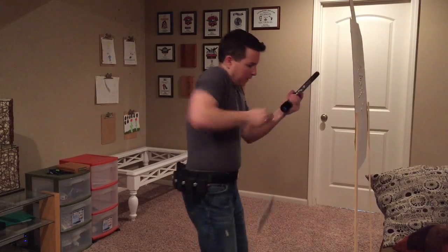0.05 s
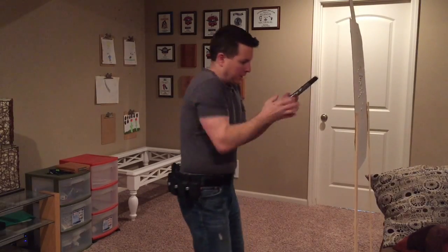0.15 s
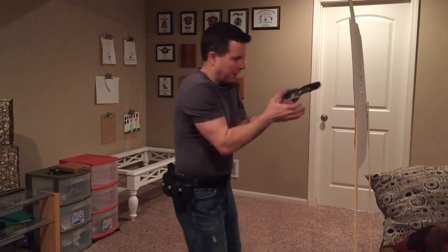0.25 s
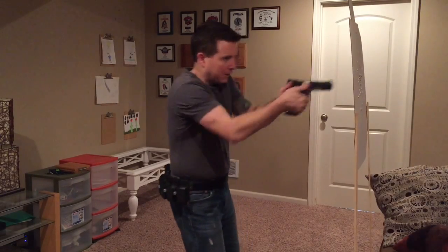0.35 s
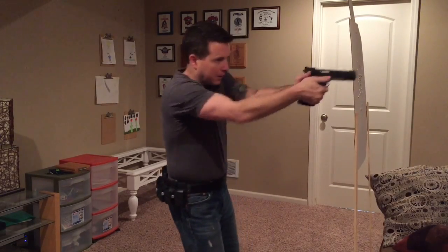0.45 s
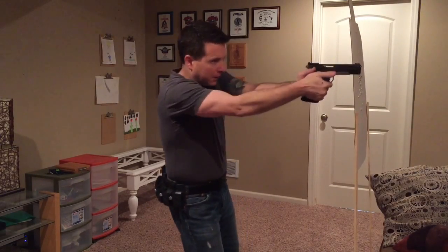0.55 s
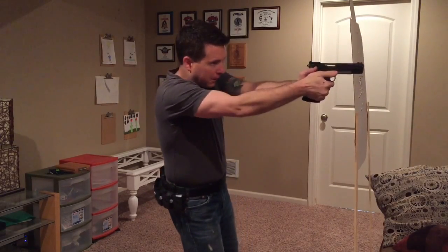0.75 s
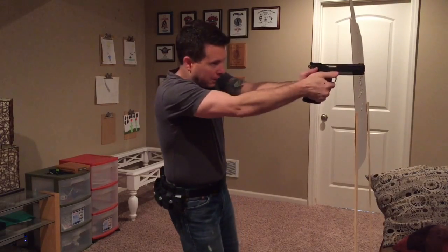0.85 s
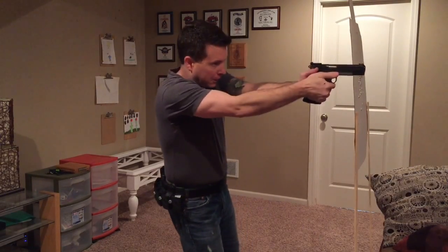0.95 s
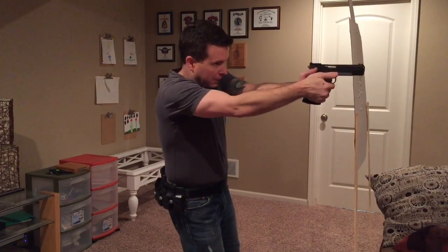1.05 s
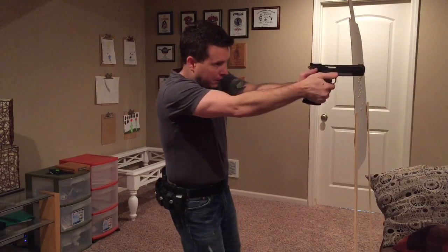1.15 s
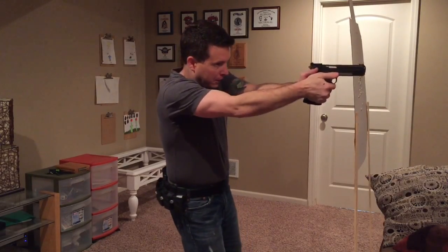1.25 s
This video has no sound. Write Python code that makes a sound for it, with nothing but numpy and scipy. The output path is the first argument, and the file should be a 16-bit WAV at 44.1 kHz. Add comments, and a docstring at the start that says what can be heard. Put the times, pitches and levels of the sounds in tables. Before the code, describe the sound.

A magazine is slapped into a pistol with hard clacks while the empty one bounces on carpet

```python
"""Reloading a pistol

Small catches click, a fresh magazine is slapped home in a double clack, and the dropped steel magazine
bounces and rattles on the carpet. Hard parts give a crack of noise and a ring; soft blows give low thuds
that sag in pitch, and scuffs are short rustles. The quiet room answers with a short tail of reflections,
over a low rumble and a faint hush of steady noise."""
import sys
import numpy as np
from scipy import signal
from scipy.fft import rfft, irfft
from scipy.io import wavfile

SR = 44100
rng = np.random.default_rng(int(sys.argv[2]) if len(sys.argv) > 2 else 0)


def wrap_up_sound(samples):
    """Save the sound to the file named by the first command line argument, as 16-bit audio."""
    columns = np.atleast_2d(samples).T
    # keep every value between -1 and 1, then stretch to whole-number steps
    tamed = np.clip(columns, -1, 1)
    steps = np.round(tamed * 32767).astype(np.int16)
    wavfile.write(sys.argv[1], SR, steps)


def magnitude_from_level(level_db):
    """Linear magnitude for a level in decibels (20 dB per decade)."""
    exponent = np.asarray(level_db, float) / 20
    return 10 ** exponent


N = 57330  # length of the scene in samples


def curve(points, hz):
    """Reads (Hz, value) points on a log-frequency axis."""
    p = np.array(points, float)
    return np.interp(np.log(hz + 0.00087), np.log(p[:, 0]), p[:, 1])


def unit(x):
    """Scales to rms 1."""
    return x / np.sqrt(np.mean(x ** 2))


def highpass(x, order, hz):
    """Takes away the sound below hz."""
    return signal.sosfilt(signal.butter(order, hz, "high", fs=SR, output="sos"), x)


def colour(x, points, tilt_db=0., tilt_from_hz=200):
    """Gives a sound a spectrum, with mean power gain 1; the tilt (dB per octave) is flat below tilt_from_hz."""
    hz = np.linspace(0, SR / 2, 1025)
    tilt = tilt_db * np.log2(np.maximum(hz, tilt_from_hz) / 3000)
    gain = unit(magnitude_from_level(curve(points, hz) + tilt))
    # fold the cepstrum (spectrum of the log gain) so that the filter never sounds before its input
    cepstrum = irfft(np.log(gain))
    cepstrum[1:1024] *= 2
    cepstrum[1025:] = 0
    response = irfft(np.exp(rfft(cepstrum)))
    return signal.fftconvolve(x, response)[:len(x)]


def fade(t, t60):
    """Falls 60 dB in t60 s."""
    return np.exp(-np.log(1000) * t / max(t60, 1e-3))


def burst(rise, t60):
    """Chattering contact: grainy noise that rises in rise s and fades."""
    t = np.arange(SR // 2) / SR
    grain_samples, rattle_db = 20, 2.2
    strengths = np.minimum(rng.exponential(size=len(t) // grain_samples + 1), 3.5)
    grain = np.repeat(strengths, grain_samples)[:len(t)]
    chatter = rng.standard_normal(len(t)) * unit(magnitude_from_level(rattle_db * grain))
    return chatter * np.minimum(t / max(rise, 1e-4), 1) * fade(t, t60)


def ring(x, modes, tilt_db=0., low_hz=1400, depth=1.6):
    """Each blow finds the modes with other strengths; hands, carpet and loose parts make them waver."""
    t, bell = np.arange(len(x)) / SR, 0
    waver_share, scatter_db = .07, 1.0  # waver rate as a share of the mode's pitch; spread of strengths
    for hz, db, t60 in modes:
        strength_db = db + scatter_db * rng.standard_normal() + tilt_db * np.log2(hz / 3000)
        luck = rng.standard_normal((2, 600))
        knots = np.arange(luck.shape[1]) / (waver_share * hz)
        # the complex waver moves both the strength and the phase of the mode
        waver = 1 + depth * (np.interp(t, knots, luck[0]) + 1j * np.interp(t, knots, luck[1]))
        tone = (waver * np.exp(2j * np.pi * hz * t)).real
        bell = bell + magnitude_from_level(strength_db) * fade(t, t60) * tone
    return highpass(signal.fftconvolve(x, bell)[:len(x)], 3, low_hz)


def steady(points):
    """Endless noise of a given colour, rms 1."""
    settle = 2048  # samples dropped while the filter starts up
    return unit(colour(rng.standard_normal(N + settle), points)[settle:])


def add(out, s, x):
    """Mixes x in at time s."""
    i = max(int(s * SR), 0)
    out[i:i + len(x)] += x[:N - i]


def strike(blows, crack, modes, low_hz, depth):
    """Hard parts hit: a crack of broad noise, which also sets the struck parts ringing."""
    out = np.zeros(N)
    for s, db, t60, tilt_db, ring_db in blows:
        contact = burst(.0009, t60)
        noise = colour(contact, crack, tilt_db)
        bell = ring(contact, modes, low_hz=low_hz, depth=depth)
        add(out, s, magnitude_from_level(db) * (noise + magnitude_from_level(ring_db - 30) * bell))
    return out


# The fresh magazine slapped home. Each row: start in seconds, level in dB, time to fall 60 dB in seconds,
# tilt of the crack in dB per octave, ring in dB (strike takes a further 30 dB off the ring).
MAGAZINE_CLACKS = [(0.201, -4.5, 0.044, 5, -9.5), (.205, -12.5, 0.072, 2.5, -4),
                   (0.2151, -16.5, 0.085, 2.5, -9.5), (.2212, -3.5, 0.049, 6, -1.5),
                   (.227, -7, 0.047, 3, -3.5), (.237, -11.5, 0.024, -2, 2.5), (.272, -15.5, .05, 2.5, -1),
                   (0.2937, -21.5, 0.078, 0.5, 3)]
# Colour of the crack. Each row: frequency in Hz, relative strength in dB per Hz.
GUN_CRACK_COLOUR = [(180, -65.5), (300, -28.5), (1480, -5), (2280, 1), (3460, -7.5), (4300, -5),
                    (7440, -14.5), (13300, -15.5), (15200, -24), (16000, -50)]
# Ringing tones of the gun. Each row: frequency in Hz, strength in dB, time to fall 60 dB in seconds.
GUN_TONES = [(1652, -0.5, 0.034), (1900, -7, 0.033), (2130, -1, 0.1), (2170, -6.5, .12), (2292, -7.5, 0.18),
             (2311, -8, 0.15), (2934, -4.5, .03), (3280, -12.5, 0.026), (3907, -6, 0.066),
             (4378, -7.5, 0.014), (5750, -6.5, 0.081), (7770, -9.5, 0.021)]


def magazine_clack():
    """The fresh magazine hits the gun: noisy cracks, with the gun's parts ringing behind them."""
    return strike(MAGAZINE_CLACKS, GUN_CRACK_COLOUR, GUN_TONES, low_hz=1400, depth=.7)


# The magazine catch and small shifts of the grip. Each row: start in seconds, level in dB, time to fall
# 60 dB in seconds, tilt of the crack in dB per octave, ring in dB (strike takes a further 30 dB off the ring).
CATCH_CLICKS = [(0., -46.5, 0.45, 0, 4), (.0268, -31.5, 0.037, -5, 1.5), (.0448, -14, 0.031, 0.5, -13.5),
                (.056, -25.5, 0.045, 1, -2.5), (.997, -68, 0.015, 11, -14), (1.11, -63.5, .03, -4.5, -5),
                (1.28, -57.5, .02, -3, -11), (1.29, -61, 0.024, 1, -2.5)]
# Colour of the click. Each row: frequency in Hz, relative strength in dB per Hz.
CATCH_CRACK_COLOUR = [(120, -48.5), (200, -21), (500, -28.5), (1040, -8.5), (1980, -14.5), (2800, -3),
                      (7140, -13.5), (13300, -17.5), (15100, -19), (16000, -37.5)]
# Ringing tones of the catch. Each row: frequency in Hz, strength in dB, time to fall 60 dB in seconds.
CATCH_TONES = [(1123, -9.5, .04), (1740, -1, .05), (2010, -3.5, 0.15), (2150, 1.5, .04), (2720, -5, .04),
               (3200, -5, 0.067), (6600, -3.5, .03)]


def catch_clicks():
    """Small parts snap or shift: short cracks, with strongly wavering tones behind them."""
    return strike(CATCH_CLICKS, CATCH_CRACK_COLOUR, CATCH_TONES, low_hz=800, depth=1.6)


# The dropped magazine rattling on the carpet. Each row: start in seconds, level in dB, rise in seconds,
# time to fall 60 dB in seconds, tilt in dB per octave, ring in dB.
MAGAZINE_BOUNCES = [(.3456, -15.5, 0.00068, 0.038, 1, -40.5), (.354, -19.5, 0.0036, 0.13, 1, -35),
                    (.374, -29.5, 0.0031, 0.26, 4, -29.5), (.551, -35.5, 0.0039, 0.059, 3, -26),
                    (.5615, -27.5, 0.0053, 0.057, 5, -35.5), (.575, -33, 0.012, 0.11, 0.5, -36),
                    (.72, -48, 0.0044, 0.15, -1, -26.5), (0.7384, -39.5, .003, 0.13, 0, -27),
                    (.752, -42, 0.0012, 0.13, 13, -33), (.8305, -29, 0.00083, 0.022, 4.5, -27),
                    (.838, -36, 0.0065, 0.084, -2, -30), (.849, -41, 0.0033, .08, 0, -29.5),
                    (.864, -34.5, 0.0032, 0.032, 4, -31), (.915, -68.5, 0.018, 0.12, -16, -20)]
# Colour of the rattle. Each row: frequency in Hz, relative strength in dB per Hz.
MAGAZINE_CRACK_COLOUR = [(100, -24), (500, -7.5), (1100, -47), (1500, -13), (2000, 5.5), (4000, -1.5),
                         (5100, -4), (7000, -2.5), (11000, -4.5), (16000, -11.5)]
# Ringing tones of the steel tube. Each row: frequency in Hz, strength in dB, time to fall 60 dB in seconds.
MAGAZINE_TONES = [(1870, -2, .12), (1960, -2, .15), (2010, 0, .15), (2250, -3, .12), (2870, -9, .04),
                  (3450, -11, .035), (4010, -11, .03), (5900, -8, .05), (6250, -11, .03), (6560, -10, .035),
                  (7500, -14, .025), (8600, -11, .025)]


def dropped_magazine():
    """The loose spring and follower chatter and ring the thin steel tube."""
    out = np.zeros(N)
    for s, db, rise, t60, tilt_db, ring_db in MAGAZINE_BOUNCES:
        chatter = burst(rise, t60)
        rattle = colour(chatter, MAGAZINE_CRACK_COLOUR, tilt_db, 1900)
        tube = ring(chatter, MAGAZINE_TONES, tilt_db, 1800)
        add(out, s, magnitude_from_level(db) * (rattle + magnitude_from_level(ring_db) * tube))
    return out


# Soft blows on floor and palm. Each row: start in seconds, level in dB, pitch settled on in Hz,
# time to fall 60 dB in seconds, knock in dB.
SOFT_BLOWS = [(0.046, -50.5, 226, 0.013, -32), (0.203, -50, 60, .08, -35), (0.223, -31, 74, 0.11, -31),
              (0.2232, -21, 515, 0.011, -31), (.2925, -21.5, 405, 0.015, -23.5),
              (0.3471, -17.5, 191, 0.055, -11), (0.376, -23.5, 161.4, 0.067, -20),
              (0.5489, -31.5, 257, 0.031, -11.5), (0.699, -46, 81, 0.16, -12),
              (.736, -32, 323, 0.068, -17.5), (0.742, -32.5, 158.8, 0.47, -38),
              (0.769, -35, 166, 0.051, -31), (0.779, -38, 280, 0.13, -25), (0.83, -22.5, 186, 0.05, -23),
              (0.862, -36.5, 179.5, 0.054, -19)]
# Colour of the dull knock inside each thud. Each row: frequency in Hz, relative strength in dB per Hz.
KNOCK_COLOUR = [(100, -15), (250, 3), (700, -8.5), (1100, -17.5), (3000, -38.5)]


def thuds():
    """A padded blow: a few damped cycles that sag in pitch, with a dull knock."""
    out, t = np.zeros(N), np.arange(SR // 2) / SR
    for s, db, hz, t60, knock_db in SOFT_BLOWS:
        # the pitch starts 45 % high and sags to hz
        cycles = hz * (t + .15 / hz * (1 - np.exp(-t * hz * 3)))
        onset = np.minimum(t * hz * 3, 1)
        boom = -np.sin(2 * np.pi * cycles) * fade(t, t60) * onset
        knock = colour(burst(0.00033, t60), KNOCK_COLOUR)
        knock = knock / np.sqrt(np.mean(knock[:400] ** 2))  # rms 1 over its first 400 samples
        add(out, s, magnitude_from_level(db) * (boom + magnitude_from_level(knock_db) * knock))
    return highpass(out, 2, 50)


# Dull scuffs of cloth or carpet. Each row: start in seconds, level in dB, length in seconds
# (a scuff falls 60 dB in three times this), centre in Hz.
CLOTH_SCUFFS = [(.7005, -45, .018, 950), (.7135, -42, .02, 1200)]


def scuffs():
    """Rubbing makes short rustles: grainy noise kept to a band in the middle range."""
    out = np.zeros(N)
    for s, db, length, hz in CLOTH_SCUFFS:
        band = [(hz / 3, -18), (hz * 0.81, -2), (hz * 1.96, 0), (hz * 3, -20), (hz * 9, -40)]
        add(out, s, magnitude_from_level(db) * colour(burst(0.003, 3 * length), band))
    return out


# How the room dies away. Each row: band centre in Hz, time to fall 60 dB in seconds, level in dB.
ROOM_BANDS = [(100, 0.22, -3), (250, .3, -3.5), (587, 0.35, -4), (1290, 0.47, -4.5), (2200, 0.38, -5.5),
              (4000, 0.47, -6.5), (6980, 0.39, -5.5), (11000, 0.25, -6.5), (14900, .26, -9)]


def room(x):
    """Dense reflections that die away band by band."""
    t = np.arange(SR // 2) / SR
    gap_s, rise_s = .004, 0.0034  # silence before the first reflection, then its rise
    noise, hz = rfft(rng.standard_normal(len(t))), np.fft.rfftfreq(len(t), 1 / SR)
    onset = np.clip((t - gap_s) / rise_s, 0, 1)
    tail = 0
    for k, (_, t60, db) in enumerate(ROOM_BANDS):
        # each band blends into its neighbours
        share = curve([(row[0], j == k) for j, row in enumerate(ROOM_BANDS)], hz)
        band = irfft(noise * share, len(t)) * fade(t, t60)
        even = np.sqrt(2 * np.log(1000) / t60 / SR)  # makes up for long fades holding more energy
        tail = tail + magnitude_from_level(db) * band * even
    return signal.fftconvolve(x, tail * onset)[:N]


# Loudness of the rumble over time. Each row: time in seconds, rms level in dB.
RUMBLE_LEVEL = [(0, -87), (.2, -65), (.35, -52.5), (.5, -54), (.65, -60.5), (.75, -48.5), (.95, -60),
                (1.052, -70), (1.3, -76)]
# Colour of the rumble. Each row: frequency in Hz, relative strength in dB per Hz.
RUMBLE_SPECTRUM = [(20, -26), (55, -3.5), (90, -4), (200, 0.5), (350, -12), (800, -43), (4000, -70.5)]


def weight_rumble():
    """Low noise swells and sinks while the body shifts its weight."""
    level_db = np.interp(np.arange(N) / SR, *np.array(RUMBLE_LEVEL).T)
    return magnitude_from_level(level_db) * steady(RUMBLE_SPECTRUM)


# Colour of the hush. Each row: frequency in Hz, relative strength in dB per Hz.
HUSH_COLOUR = [(12, -64.5), (20, -33.5), (49, -5.5), (116, -1.5), (399, -14.5), (485, -11.5), (558, -26),
               (678, -14), (1000, -22.5), (1120, -19.5), (1530, -21), (14700, -32), (16000, -49)]


def hush():
    """Faint steady noise, strongest in the lows, at -66.5 dB rms."""
    return magnitude_from_level(-66.5) * steady(HUSH_COLOUR)


def scene():
    """All blows, their room, the rumble and the hush."""
    dry = magazine_clack() + catch_clicks() + dropped_magazine() + thuds() + scuffs()
    return (dry + room(dry) + weight_rumble() + hush())[None]


def low_pass(x):
    """Removes everything above the highest recorded frequency."""
    return signal.sosfilt(signal.butter(12, 16470, fs=SR, output="sos"), x)


def record(dry):
    """Rounds off the loudest peaks and cuts the top in two steps."""
    rounded = np.tanh(1.35 * dry) / 1.35
    gentle_cut = signal.ellip(8, .2, 36, 15500, fs=SR, output="sos")
    steep_cut = signal.ellip(10, .2, 70, 16300, fs=SR, output="sos")
    mix = signal.sosfilt(steep_cut, signal.sosfilt(gentle_cut, rounded))
    return low_pass(mix)


dry = scene()
out = record(dry)
wrap_up_sound(out)
```